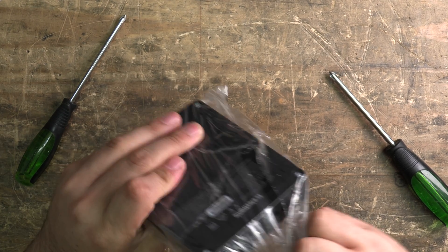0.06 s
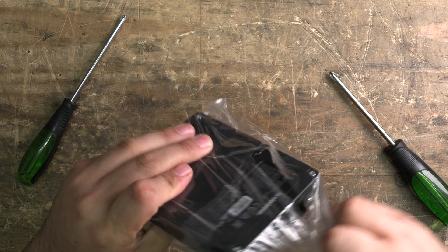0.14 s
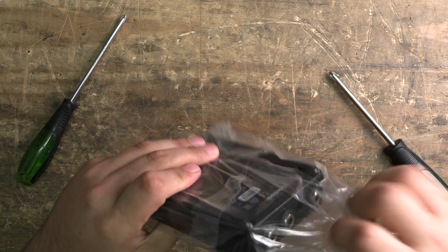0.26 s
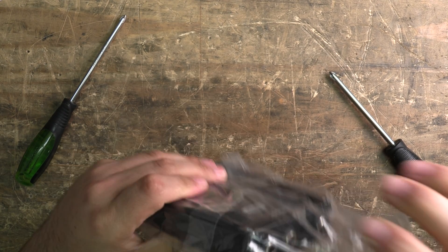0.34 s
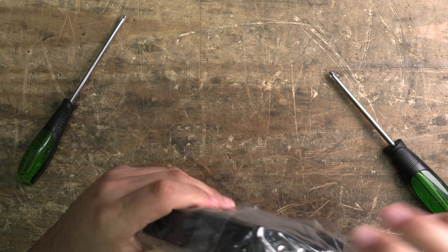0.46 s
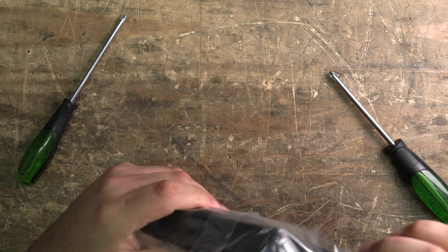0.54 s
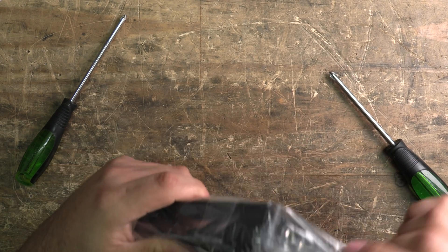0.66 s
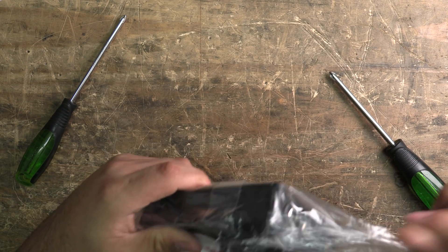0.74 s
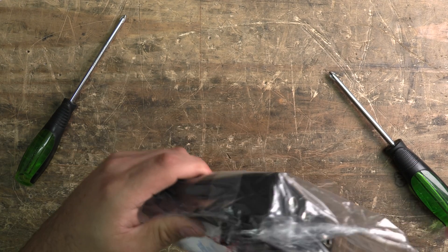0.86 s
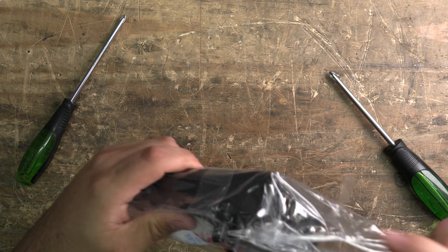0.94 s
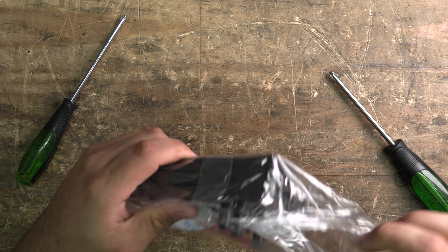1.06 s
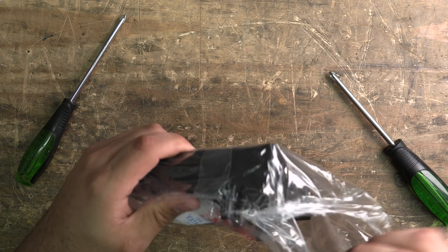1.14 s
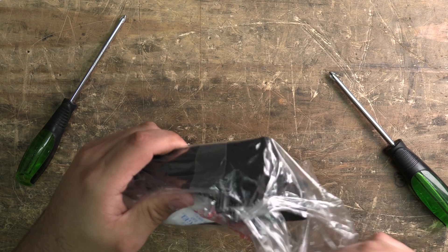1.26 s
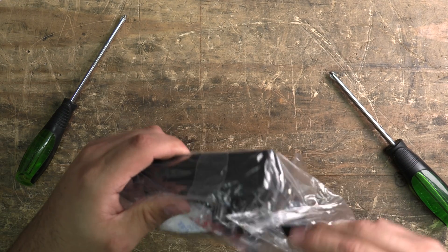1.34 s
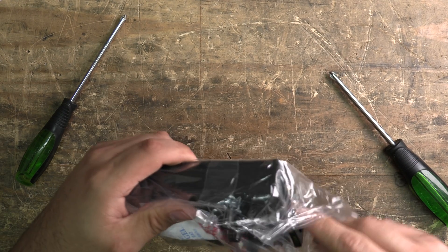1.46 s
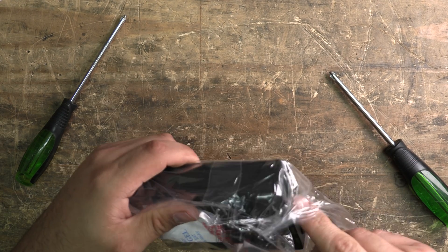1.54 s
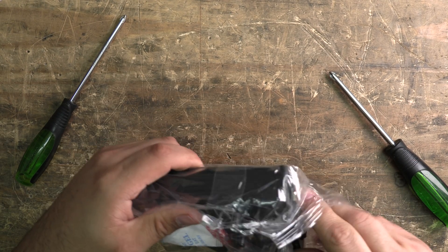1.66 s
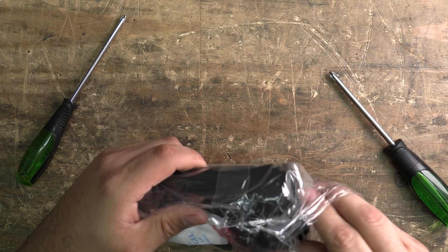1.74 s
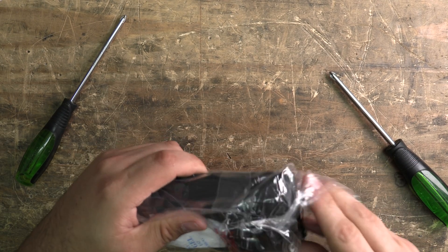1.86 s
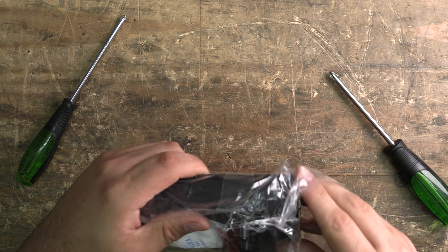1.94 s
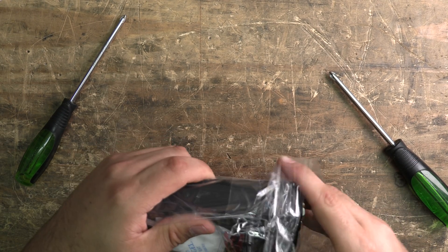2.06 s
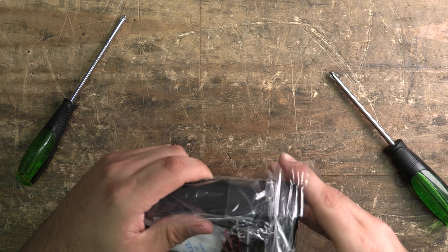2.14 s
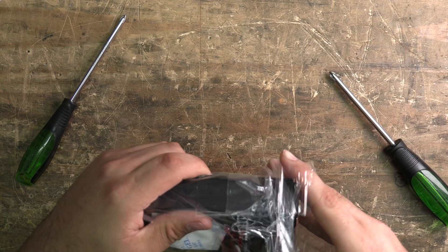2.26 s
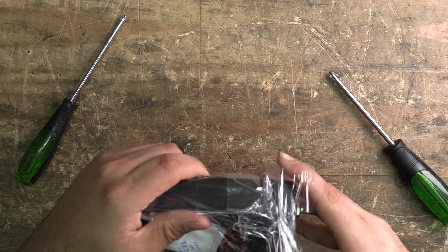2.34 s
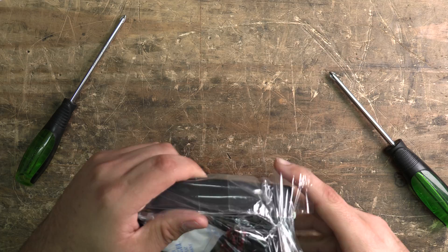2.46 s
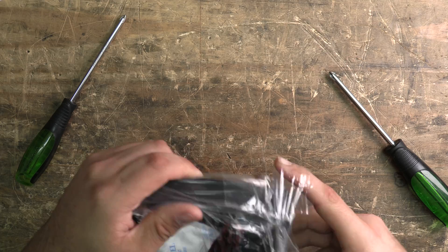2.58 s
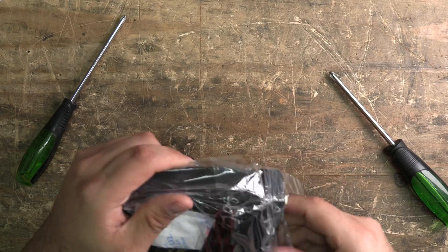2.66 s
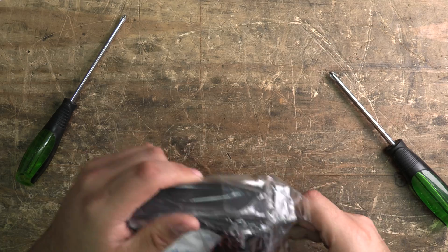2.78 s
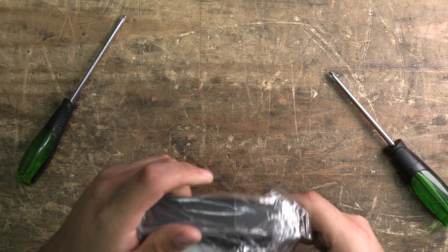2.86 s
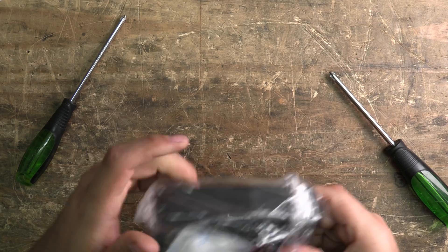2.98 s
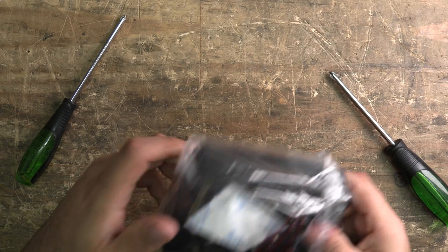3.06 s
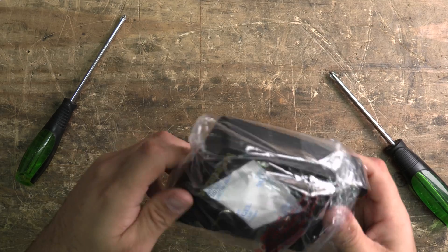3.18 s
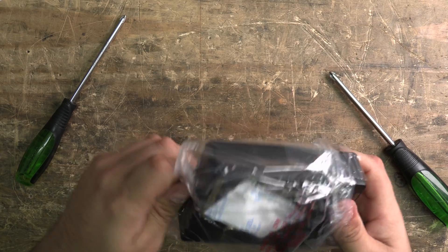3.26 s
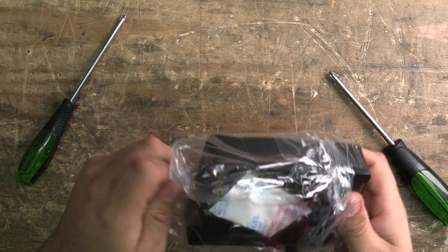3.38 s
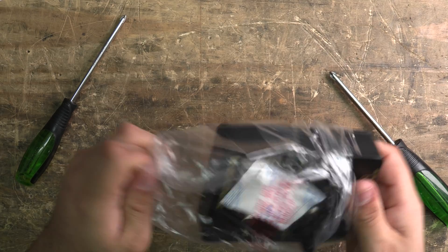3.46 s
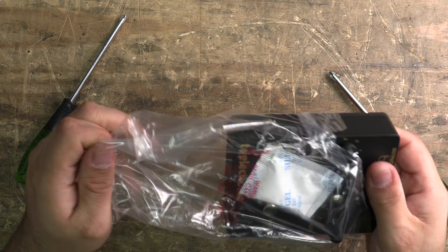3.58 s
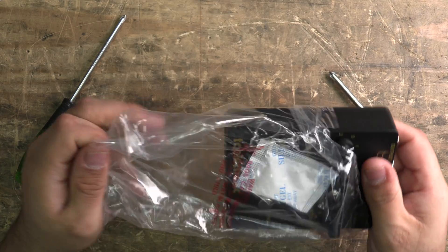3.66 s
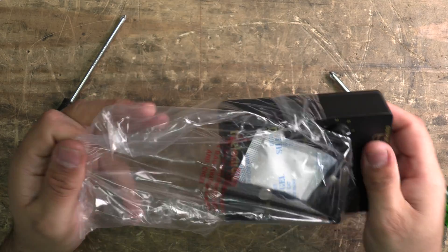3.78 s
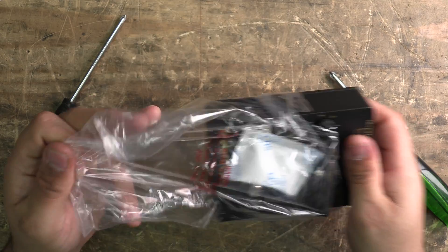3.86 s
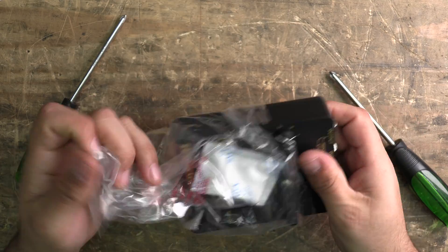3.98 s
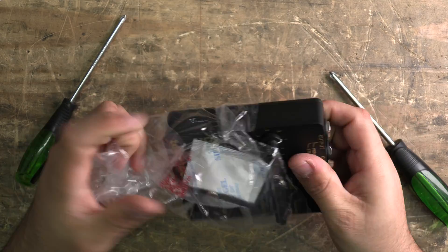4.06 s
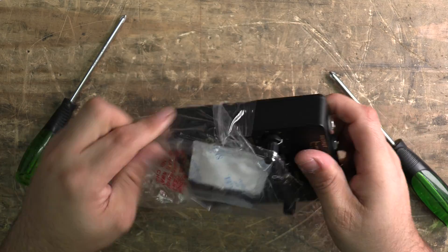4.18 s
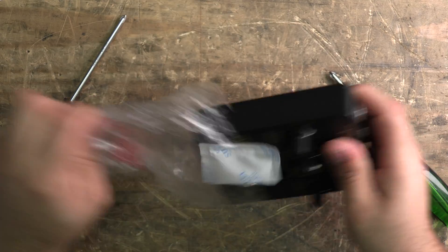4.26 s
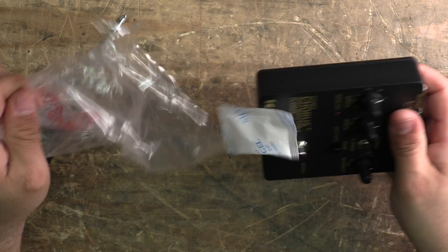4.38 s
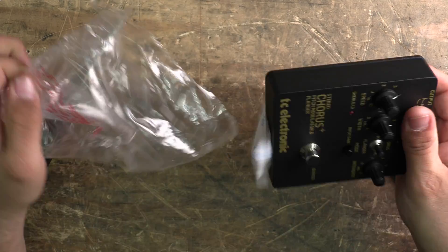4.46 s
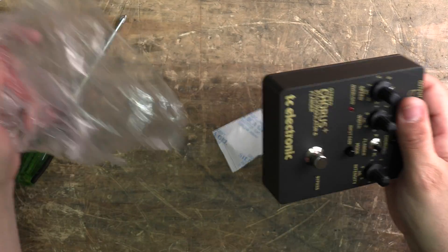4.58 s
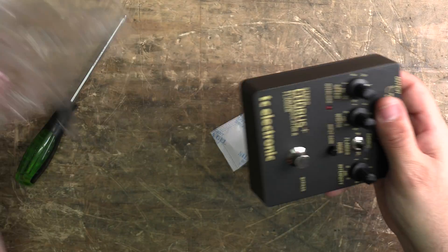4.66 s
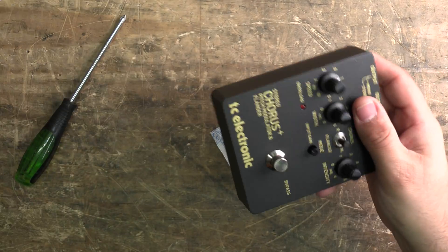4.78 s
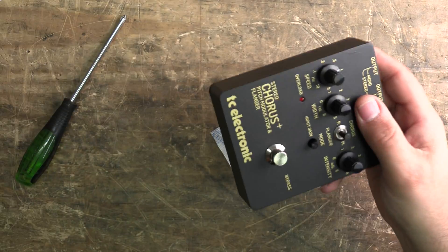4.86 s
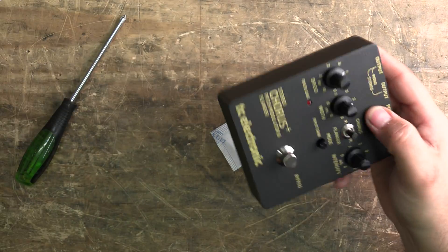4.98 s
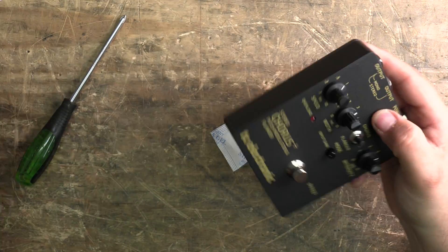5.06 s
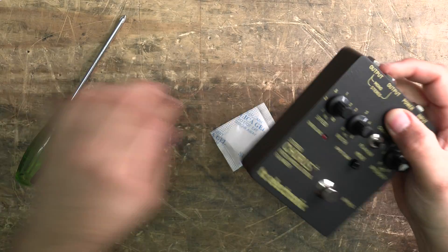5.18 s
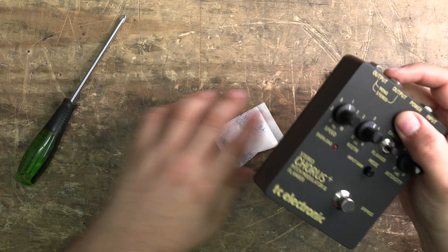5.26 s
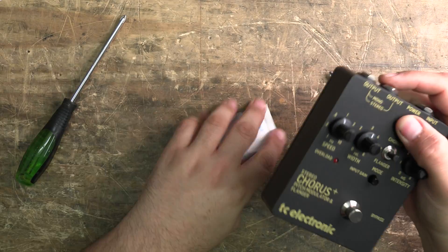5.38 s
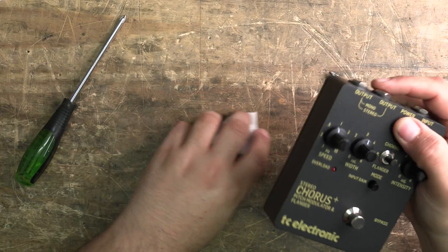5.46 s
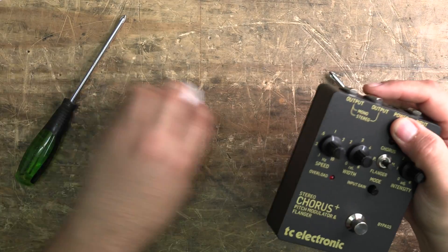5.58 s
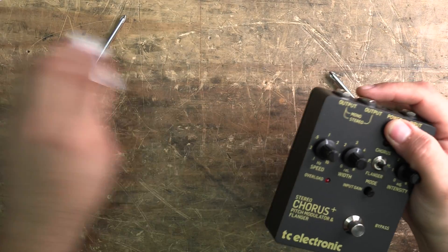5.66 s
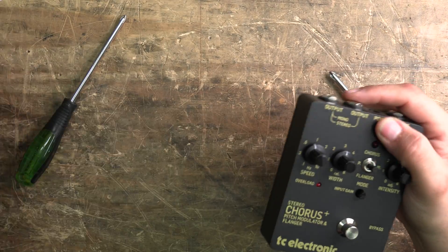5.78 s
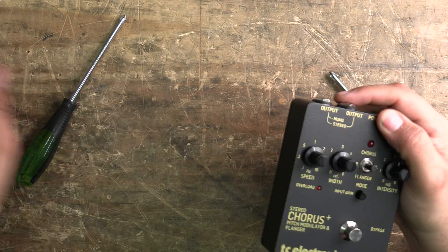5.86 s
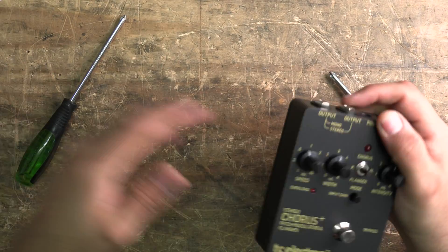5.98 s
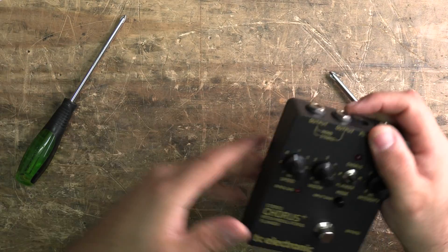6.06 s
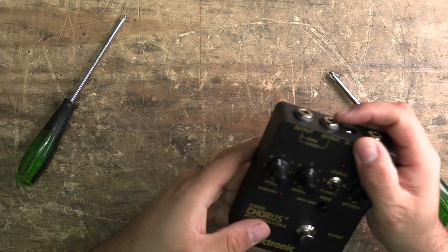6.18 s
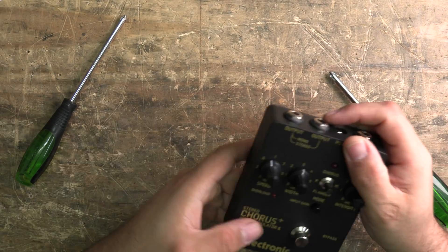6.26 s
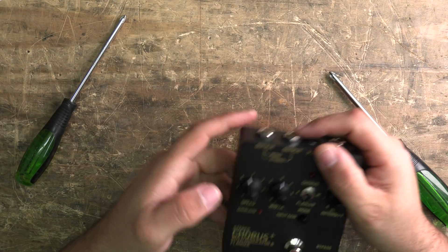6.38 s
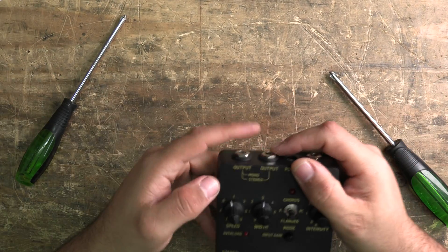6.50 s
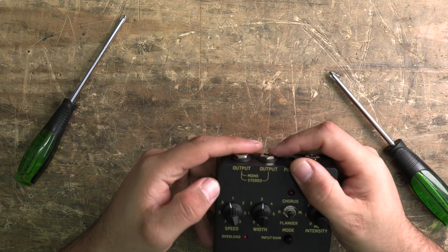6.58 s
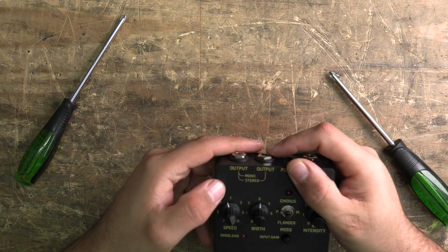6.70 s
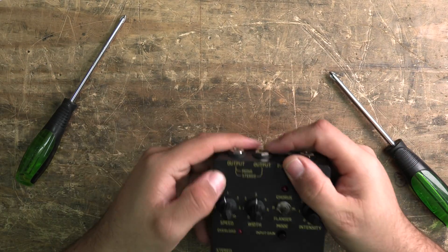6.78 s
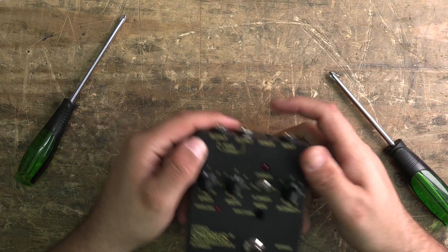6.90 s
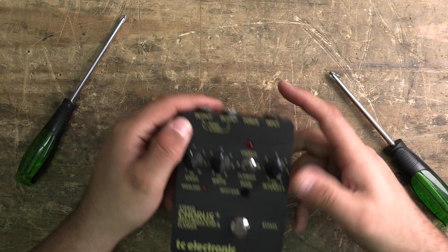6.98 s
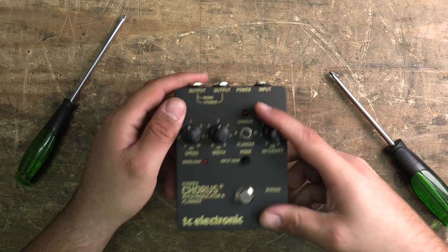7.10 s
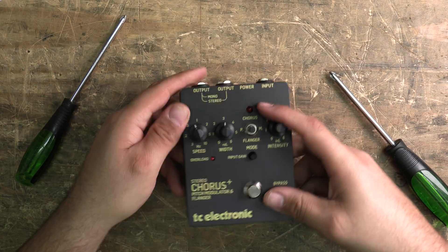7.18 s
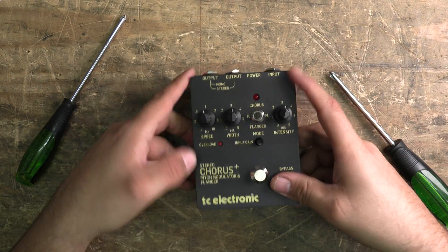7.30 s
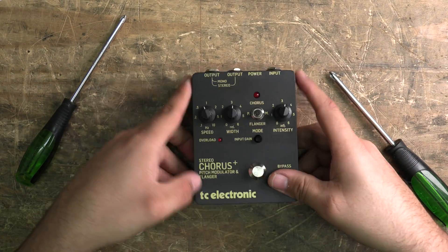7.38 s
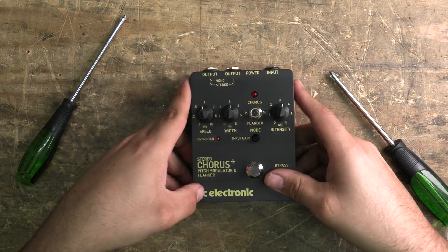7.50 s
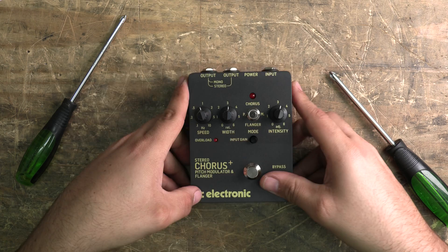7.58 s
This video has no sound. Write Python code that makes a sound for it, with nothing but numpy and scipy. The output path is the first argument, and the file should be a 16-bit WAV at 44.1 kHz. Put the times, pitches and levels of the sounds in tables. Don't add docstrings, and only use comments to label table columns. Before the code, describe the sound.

A burst of crisp snaps and a dull knock opens the scene, followed by restless plastic film crinkling in separate tugs. The bag slides away with a few hard clicks, then a papery packet is brushed aside more softly. The end is very quiet: hissing skin friction and small damped metallic touches on a box. Close, mono, nearly dry small room with low background rumble.

```python
import sys
import numpy as np
from scipy import signal
from scipy.io import wavfile

SR = 44100
rng = np.random.default_rng(int(sys.argv[2]) if len(sys.argv) > 2 else 0)


def dump(signal):
    limited = np.clip(np.atleast_2d(signal).T, -1, 1)
    pcm = np.round(limited * 32767).astype(np.int16)
    wavfile.write(sys.argv[1], SR, pcm)


def boost_factor(decibels):
    exponent = np.asarray(decibels, float) / 20
    return 10 ** exponent


N = 336831
SACHET_S = 5.4


def film(creases_per_s, size_db, colour_octaves, smooth_db, crease_db, snap_db):
    # frequency in Hz, level in dB per Hz.
    sheet_colour = [(35, -38), (60, -8.5), (217, -6.5), (256, -5.5), (408, -2.5), (448, -4), (503, -5),
                    (715, -5.5), (1200, -11), (2520, -6), (3580, -9), (4750, -6.5), (8510, -9.5),
                    (13900, -7), (16000, -7.5)]
    # frequency in Hz, t60 in s.
    buckle_decay = [(200, 0.027), (700, 0.025), (2500, 0.01), (6000, 0.014), (15000, 0.0056)]
    # frequency in Hz, t60 in s.
    room_decay = [(200, .25), (2000, .2), (15000, .12)]
    room_db = -25
    rustle_db, boom_db, bright_db = handling()
    swarm = drift(25)
    born, crease_sizes_db, centre_octave = creases(rustle_db, swarm, creases_per_s, size_db, crease_db)
    s, peak_db, low_db, body_db, top_db = buckles()
    at = np.round(s * SR).astype(int)
    phase = 7 * rng.random(len(at))
    buzz = rng.choice([-1., 1.], N)
    hiss = rng.standard_normal((2, N))
    slither_db = smooth_db + 2.2 * swarm
    out = np.zeros(N)
    for k, (hz, sos) in enumerate(bands(55.5, order=1)):
        t60_s = at_hz(buckle_decay, hz)
        low = at_hz([(1000, 1), (1600, 0)], hz)
        body = at_hz([(1000, 0), (1600, 1), (3500, 1), (4800, 0)], hz)
        high = at_hz([(7500, 0), (10500, 1)], hz)
        level = boost_factor(rustle_db + low * (boom_db + 7.5) + high * bright_db)

        off_centre = (np.log2(hz) - centre_octave) / colour_octaves
        crease_power = dying(born, boost_factor(crease_sizes_db - 3.7 * off_centre ** 2), 0.6 * t60_s)

        thin_db = at_hz([(130, -4), (450, 0.5)], hz)
        colour_db = low * (low_db + 6.5) + body * (body_db + 3) + high * (top_db + 3) + thin_db
        uneven_db = 3 * np.sin(phase * k)
        snap_power = dying(at, boost_factor(peak_db + snap_db + colour_db + uneven_db), t60_s)

        direct = level ** 2 * crease_power + snap_power
        keep = boost_factor(-120 / (at_hz(room_decay, hz) * SR))
        echoes = boost_factor(room_db) ** 2 * signal.lfilter([.01], [1, -keep], direct)
        slither = (level * boost_factor(slither_db + 1.8 * drift(6))) ** 2
        drive = buzz * np.sqrt(direct) + np.sqrt(slither + echoes) * hiss[k % 2]
        out += (-1) ** k * boost_factor(at_hz(sheet_colour, hz)) * signal.sosfilt(sos, drive)
    return backed(out)


def creases(rustle_db, swarm, creases_per_s, size_db, crease_db):
    crowding = .25
    chance, luck = rng.random(N), rng.random((N, 2))
    rate_per_s = creases_per_s * boost_factor(3 * swarm + crowding * (rustle_db + 50))
    born = np.flatnonzero(chance < rate_per_s / SR)
    sizes_db = crease_db - crowding * np.clip(rustle_db[born] + 50, -15, 15)
    sizes_db -= size_db * np.log(np.maximum(luck[born, 0], .1))
    sizes_db -= 8 * (born > SACHET_S * SR)
    centre_octave = np.log2(900) + 4.6 * luck[born, 1] ** 0.94
    return born, sizes_db, centre_octave


def buckles():
    # time in s, peak in dB, then boom, body and top in dB relative to it.
    sheet_snaps = [(.1645, -35, -24, -4.5, -5.5), (.1916, -37, -10, -4, -2), (.365, -40, -26, -13, 1),
                   (.421, -39.5, -21, -3.5, -5), (.5045, -35.5, -21, -12, -8), (.7008, -35.5, -28, 2, -3),
                   (.729, -37.5, -1, -3, -4), (.8079, -37, -19, -4, 5.5), (.8482, -35.5, -1.5, 0, 0),
                   (.8745, -34.5, 4.5, 4, -1), (1.0197, -33, -17, -11, -5), (1.164, -40.5, -17, 6, 8),
                   (1.1802, -32, -3, -10, 0), (1.222, -40, -25, -6, 8.5), (1.313, -38, -20, -8, 0),
                   (1.3687, -33.5, 0, 5, 3), (1.4108, -35, -2, -2, -8), (1.469, -36.5, -28, -.5, 2),
                   (1.5432, -43.5, -18, -18, -5), (1.7411, -35, -15, -1.5, 3), (1.7924, -40, -10, -7, -2),
                   (1.9513, -41, 4, .5, 4.5), (2.138, -36, -5, -2, 6.5), (2.2018, -36.5, -3, 3, 2),
                   (2.3704, -42, -21, 0, -17), (2.4614, -44, -2, -4.5, -14), (2.4957, -43, -8, -1, -3),
               (2.6006, -41.5, -20, -19, 6.5), (2.6707, -33, -12, -7, 2), (2.6922, -22.5, -12, -7, -1),
               (2.8072, -38, -23, -2.5, -5), (2.8315, -31, -18, -16, -4), (2.8516, -45, -15, 9, -2),
               (2.899, -36, -12, -6, 0), (2.9856, -41, -21, -2, -10), (3.168, -52, -22, 6, -13),
               (3.2818, -32.5, -20, -13, -21), (3.3221, -26.5, -33, -23, -9), (3.421, -32, -7.5, -9, -13),
               (3.4687, -35, -6.5, -5, 0), (3.5438, -34.5, -8, -3, 1), (3.793, -36.5, -11, -1, -6),
               (3.9581, -36, -26, -14, 5), (4.0244, -29.5, -14.5, -8, -9), (4.1715, -43.5, -17, -6, 6),
               (4.299, -28, -2, -8, 0), (4.3041, -23, -11, -6, -25), (4.4387, -38.5, -33, 3.5, -7),
                   (4.6665, -16.5, -22, 1.5, -19), (4.7957, -46, -9, -3, 0), (4.8229, -38.5, -10.5, -8, -16),
                (4.9595, -50, -4, 9, 7), (4.9895, -39.5, -9, 3, -2), (5.5, -37, -37, -6, -2),
                (5.5255, -33, -21, -5, 2), (5.5486, -36, -23, -12, 3), (5.559, -27, -42, -16, -11),
                (5.629, -34, -14, -3, -5), (5.644, -43, -10, 0, 0), (5.708, -46, -30, -6, -1),
                (5.8895, -49, -14, -6, -1), (5.801, -52, -20, -6, 6), (5.988, -42, -10, 0, -2),
                   (.0425, -26, -11, -7.5, -2), (0.0862, -21.5, -1, 9, 1), (.089, -23, -5, 11.5, 2.5),
            (0.0925, -21.5, -9, 5, 0), (0.0945, -24, 0, 4, -2), (0.0988, -20.5, -13, 0, 3),
            (0.1023, -20.5, -13, -5, -4), (0.107, -33, -1, -9, -6), (0.1168, -26, -12.5, -7, -9),
            (0.8763, -29, -4, -1.5, -9), (0.88, -37.5, -9, 7, 8), (4.669, -18.5, -12, -9.5, -4),
            (4.6773, -21.5, -14.5, -7, -5), (4.91, -47, -25, -10, -6), (2.079, -30.5, -8, -10, 2),
            (2.648, -33, -7, -4, -3), (3.502, -35, 0, -9, -5), (4.209, -33, -12, -4, -2.5),
            (5.39, -70, -15, -12, 12), (5.16, -58.5, 5, 12, -8), (5.172, -61.5, -4, 2, -11),
            (6.701, -69, 15, 2, -15), (7.063, -61.5, 10, 4, -5), (7.191, -64, 8, 5, 12)]
    return np.transpose(np.array(sheet_snaps))


def backed(sheet):
    over_box = np.arange(N) < SACHET_S * SR
    by_box = 0.47 * resonance(sheet, 2310, 550) - 0.18 * resonance(sheet, 1000, 650)
    by_bench_and_sachet = 0.5 * resonance(sheet, 1400, 1200) + 0.4 * resonance(sheet, 7500, 4000)
    return sheet + over_box * by_box + ~over_box * by_bench_and_sachet


def handling():
    # peak time in s, rustle in dB, rise and fall in s per 10 dB,
    # air pocket boom in dB relative to the rustle.
    tugs = [(0.06, -51, .05, .2, -2), (.094, -31, .009, .018, -9), (.36, -51, .3, .07, 2),
            (.515, -55, .05, .04, -1), (.612, -43.5, .018, .12, 2), (.79, -40.5, .06, .045, -6),
            (.916, -48, .06, .035, -3), (1.01, -52, .03, .08, -1), (1.165, -49, .065, .03, 1),
            (1.38, -46.5, .125, .09, -3), (1.48, -51, .06, .025, -2), (1.594, -57, .045, .07, 0),
            (1.74, -49, .055, .07, 0), (1.9, -54.5, .08, .15, 2), (2.12, -40, .075, .085, 0),
            (2.385, -50, .085, .045, 1), (2.52, -53, .06, .06, 0), (2.71, -43.5, .095, .055, -2),
            (2.9, -50.5, .09, .21, -4.5), (3.328, -47.5, .13, .11, -2), (3.6, -40.5, .15, .065, 0),
            (3.8, -52, .12, .1, 0), (4.08, -44.5, .15, .075, -1), (4.32, -38, .08, .09, -3)]
    aside = [(4.55, -54.5, .15, .06, -2), (4.69, -49, .015, .075, -5), (4.83, -65, .05, .04, -3),
             (4.985, -57, .09, .1, -2), (5.176, -75, .1, .2, 5), (5.455, -48, .008, .1, -11),
             (5.505, -40.5, .026, .11, -14), (5.645, -49, .03, .04, -10), (5.815, -54, .075, .05, -14),
             (5.925, -54, .012, .1, -4), (5.994, -46, .055, .05, -6), (6.158, -70, .15, .06, 0)]
    bag_free_s, bag_bright_db, aside_bright_db = 4.62, .3, -2.5
    s, db, rise_s, fall_s, boom_db = np.transpose(np.concatenate([tugs, aside]))
    rustle_db = swells(s, db, rise_s, fall_s)
    bright_db = np.where(np.arange(N) / SR < bag_free_s, bag_bright_db, aside_bright_db)
    bright_db = bright_db + .1 * (rustle_db + 53)
    return rustle_db, swells(s, db + boom_db, rise_s, fall_s) - rustle_db, bright_db


def knocks():
    # time in s, peak in dB, pitch in Hz, t60 in s.
    contacts = [(.092, -23, 455, 0.021), (.104, -33, 566, 0.079), (0.289, -34.5, 447, 0.022),
                (.876, -39, 425, 0.037), (.518, -47, 1200, .015), (2.203, -42, 900, .015),
                (5.168, -52.5, 2700, .02), (5.056, -58.5, 1870, 0.052), (5.154, -40, 405, 0.025),
                (5.323, -57, 3700, 0.012), (7.18, -58.5, 738, 0.029), (7.202, -63, 2760, 0.017),
                (7.628, -58, 1680, 0.024)]
    out, t = np.zeros(N + SR // 4), np.arange(SR // 4) / SR
    soft_onset = 1 - np.exp(-t / 0.0021)
    for s, peak_db, hz, t60_s in contacts:
        i = round(s * SR)
        decay = boost_factor(peak_db + 11 - 60 * t / t60_s)
        out[i:i + len(t)] += decay * soft_onset * np.sin(2 * np.pi * hz * t)
    return out[:N]


def box():
    # time in s, skin hiss in dB, low, high and top ring in dB.
    strokes = [(6.2, -80, -88, -82, -84), (6.37, -80, -90, -72, -76), (6.455, -74, -72, -66, -71),
               (6.49, -81, -70, -72, -76), (6.8, -84, -76, -79, -85), (6.95, -76, -70, -76, -64),
               (7.06, -77, -76, -78, -63), (7.17, -78, -72, -76, -76), (7.27, -79, -70, -72, -78),
               (7.36, -78, -80, -74, -76), (7.45, -81, -76, -74, -76), (7.52, -78, -73, -73, -78),
               (7.63, -80, -76, -85, -85)]
    # frequency in Hz, width in Hz, level in dB.
    modes = [(1086, 154, 6), (1420, 57, -1.5), (2230, 180, 1.5), (3720, 90, -4), (5000, 150, -2),
             (5840, 130, 3.5), (6380, 60, -9.5), (7350, 120, -11), (8370, 250, -5), (10500, 120, -15)]
    s, *layers_db = np.transpose(strokes)
    skin_db, low_db, high_db, top_db = [swells(s, db, rise_s=.035, fall_s=.08) for db in layers_db]
    touch = np.clip((np.arange(N) / SR - 6.2) / .05, 0, 1)
    white = rng.standard_normal((2, N))
    out = boost_factor(skin_db + 9) * signal.lfilter([1, -.6], [1], white[0])
    for hz, width_hz, db in modes:
        ring = rms_one(resonance(white[1], hz, width_hz))
        stroke_db = low_db if hz < 3000 else high_db if hz < 7000 else top_db
        out += ring * boost_factor(db - 8.5 + stroke_db + 3.3 * drift(12.8))
    return touch * out


def rumble():
    # frequency in Hz, level in dB per Hz.
    room_colour = [(12, -44), (20, -15), (70, -9), (104, -16.5), (146, -15), (158, -22), (293, -22.5),
                   (410, -28.5), (660, -31.5), (949, -35), (16000, -53)]
    rumble_db = -66 + 3.5
    white = rng.standard_normal((2, N + SR))
    out = np.zeros(N)
    for k, (hz, sos) in enumerate(bands(20.3, order=2)):
        settled = signal.sosfilt(sos, white[k % 2])[SR:]
        out += boost_factor(at_hz(room_colour, hz)) * settled
    return boost_factor(rumble_db) * rms_one(out)


def swells(s, peak_db, rise_s, fall_s):
    roundness = 1.35
    late_s = np.arange(0, N + 64, 64)[:, None] / SR - s
    away = np.where(late_s < 0, -late_s / rise_s, late_s / fall_s)
    power = boost_factor(2 * (peak_db - 10 * away ** roundness)).sum(axis=1)
    return np.interp(np.arange(N) / 64, np.arange(len(power)), 10 * np.log10(power + 1e-14))


def dying(at, heights, t60_s):
    power = np.full(N, 1e-18)
    np.add.at(power, at, heights ** 2)
    return signal.lfilter([1], [1, -boost_factor(-120 / (t60_s * SR))], power)


def resonance(x, hz, width_hz):
    r = np.exp(-np.pi * width_hz / SR)
    poles = [1, -2 * r * np.cos(2 * np.pi * hz / SR), r * r]
    return signal.lfilter(np.array([1, 0, -1]) * (1 - r * r) / 2, poles, x)


def drift(rate_hz):
    r = np.exp(-80 * np.pi * rate_hz / SR)
    slow = signal.lfilter([1], [1, -2 * r, r * r], rng.standard_normal(N // 40 + 2002))[2000:]
    return np.interp(np.arange(N) / 40, np.arange(len(slow)), rms_one(slow))


def bands(low_hz, order):
    edges_hz = low_hz * 2 ** np.arange(0, np.log2(19000 / low_hz), 1 / 3)
    return [(np.sqrt(a * b), signal.butter(order, [a, b], "band", fs=SR, output="sos"))
            for a, b in zip(edges_hz, edges_hz[1:])]


def at_hz(points, hz):
    points_hz, values = np.transpose(points)
    return np.interp(np.log(hz), np.log(points_hz), values)


def rms_one(x):
    return x / np.sqrt(np.mean(x ** 2) + 1e-20)


def scene():
    sheet = film(creases_per_s=750, size_db=6.5, colour_octaves=0.72,
                 smooth_db=7.8, crease_db=17, snap_db=16)
    near = sheet + knocks() + box()
    return (near + rumble())[None, :]


def band_limit(x):
    return signal.sosfilt(signal.butter(12, 16970, fs=SR, output="sos"), x)


def record(dry):
    low_pass = signal.cheby2(10, 50, 16000 * 1.04, fs=SR, output="sos")
    return band_limit(signal.sosfilt(low_pass, dry))


dry = scene()
out = record(dry)
dump(out)
```